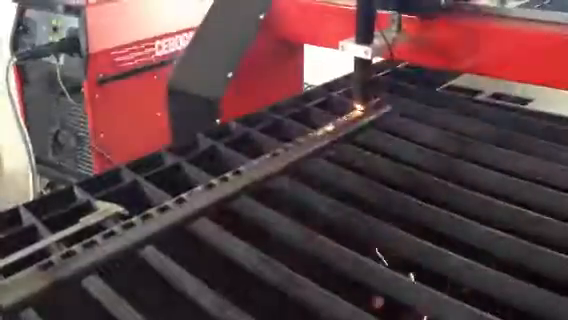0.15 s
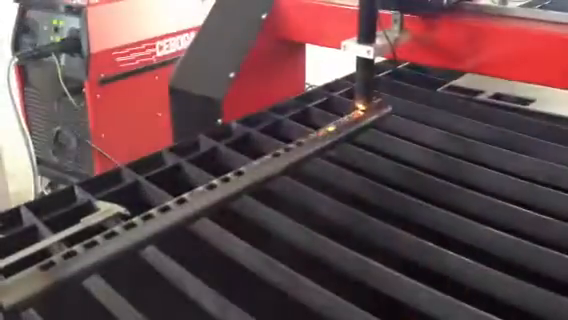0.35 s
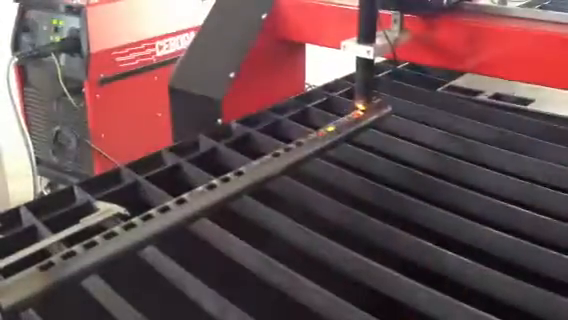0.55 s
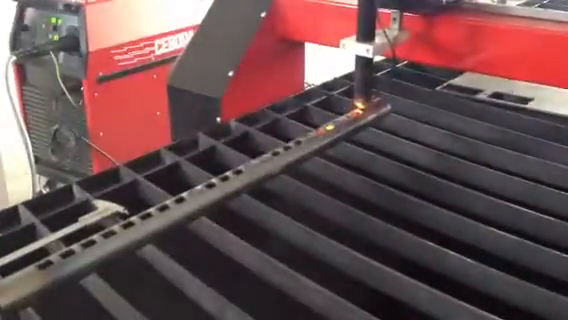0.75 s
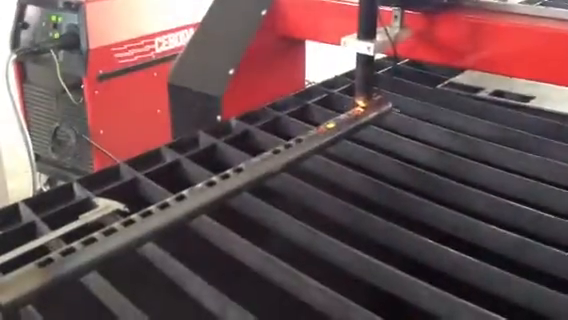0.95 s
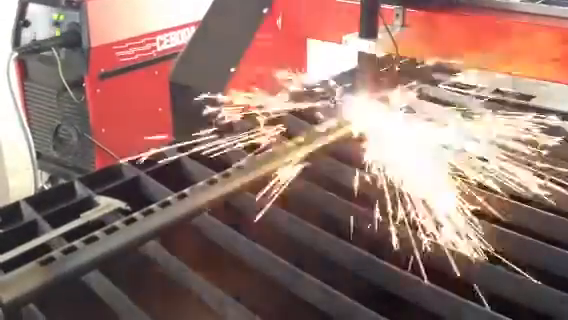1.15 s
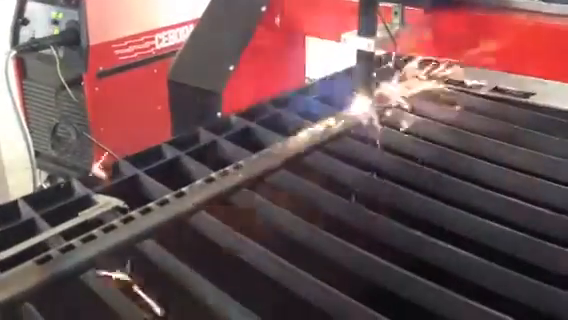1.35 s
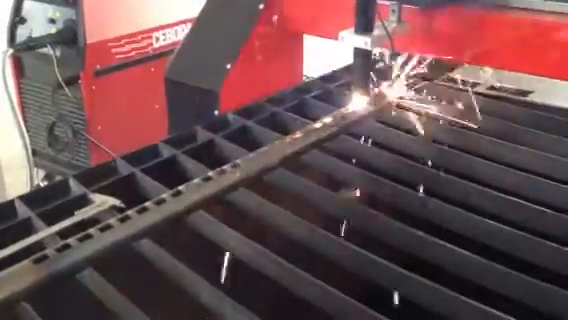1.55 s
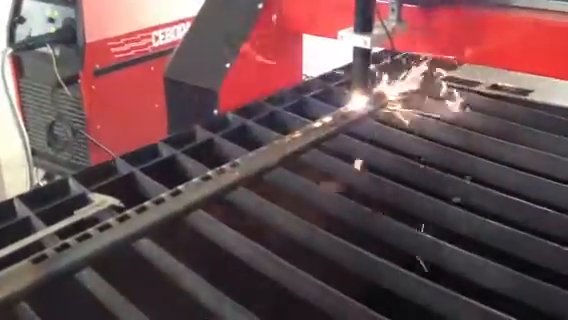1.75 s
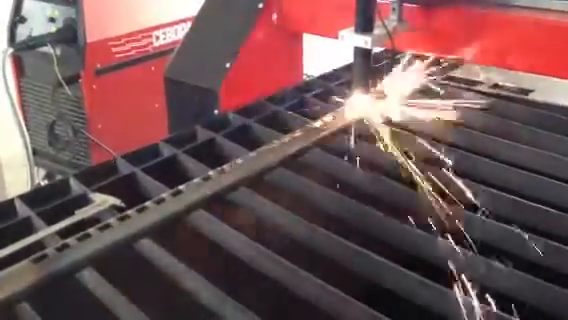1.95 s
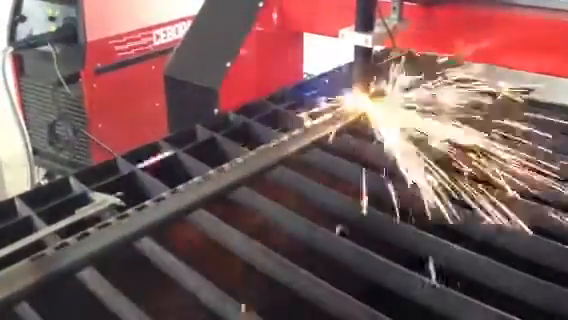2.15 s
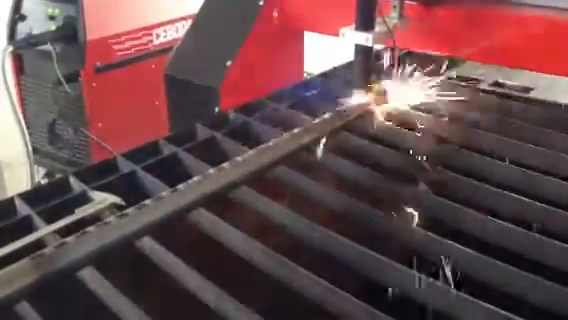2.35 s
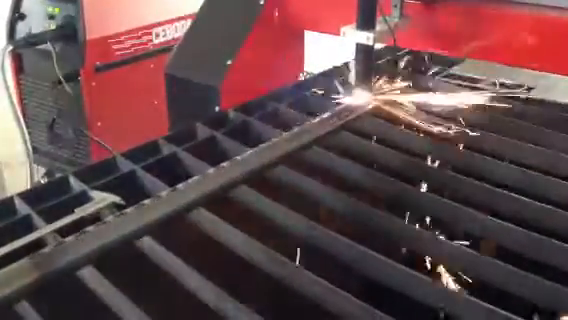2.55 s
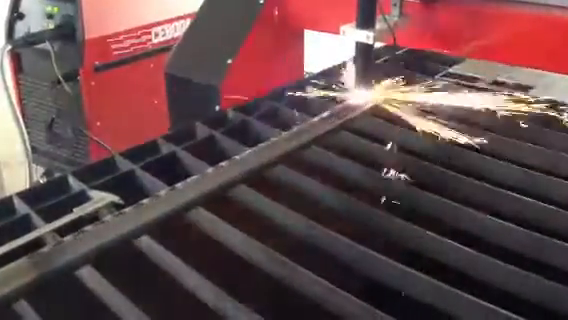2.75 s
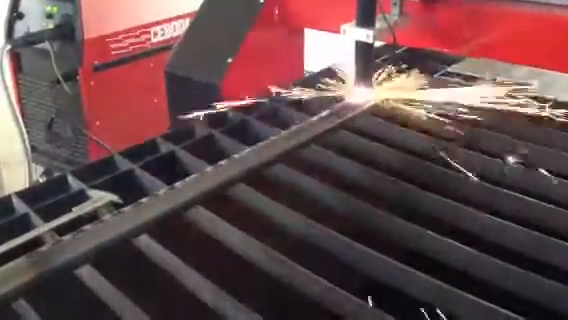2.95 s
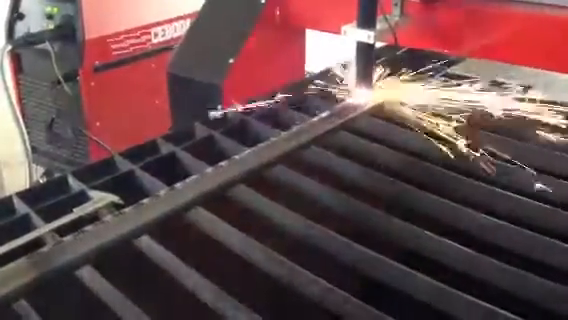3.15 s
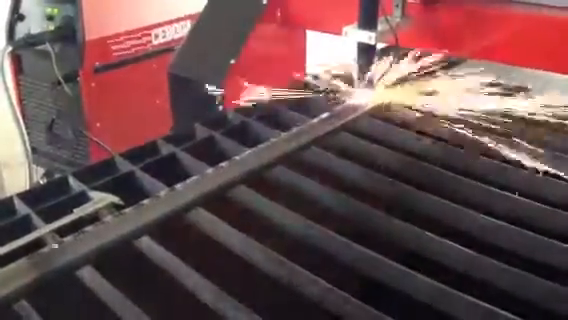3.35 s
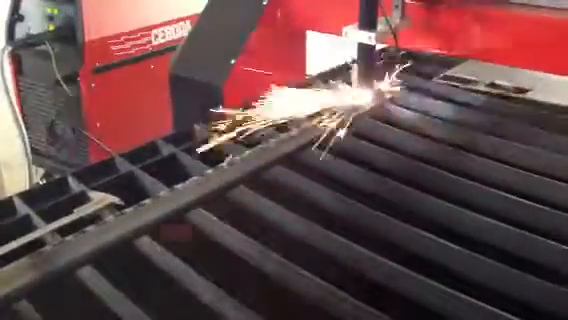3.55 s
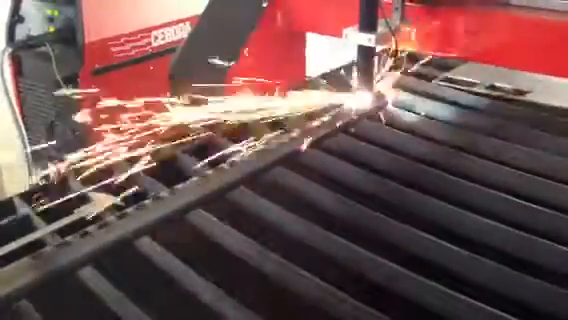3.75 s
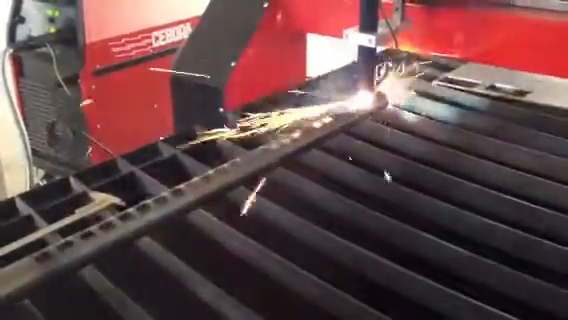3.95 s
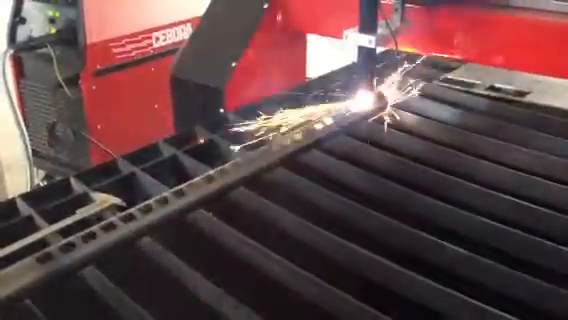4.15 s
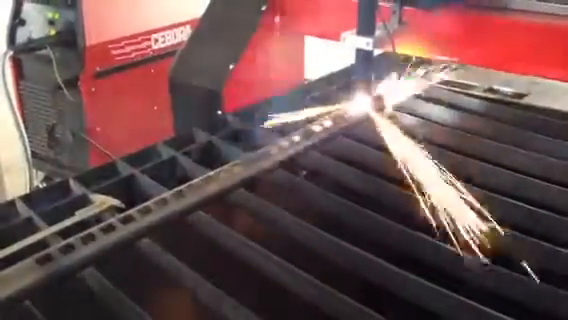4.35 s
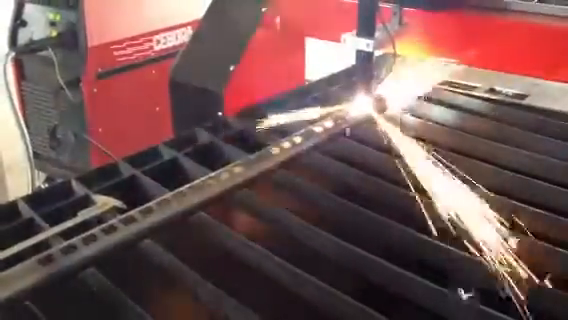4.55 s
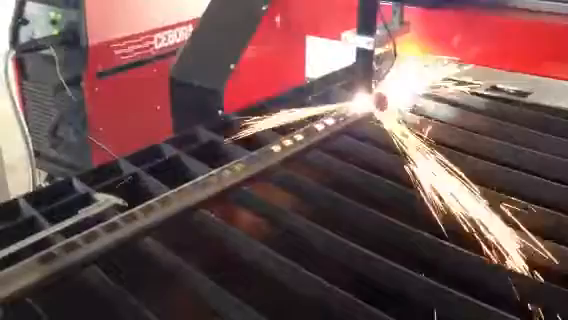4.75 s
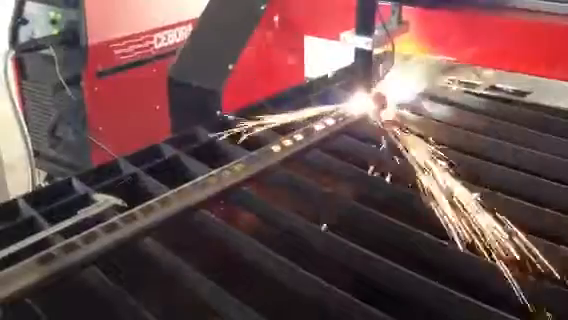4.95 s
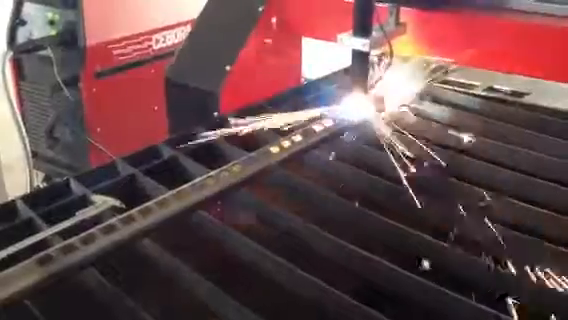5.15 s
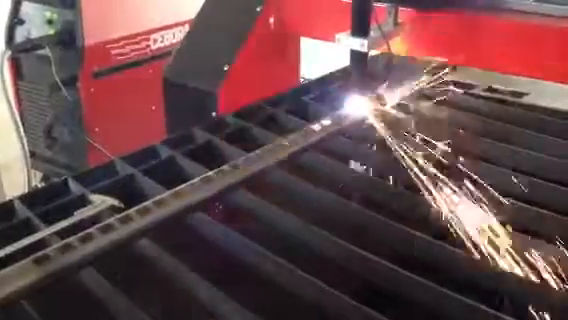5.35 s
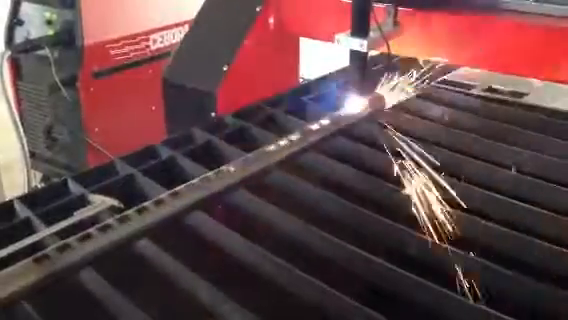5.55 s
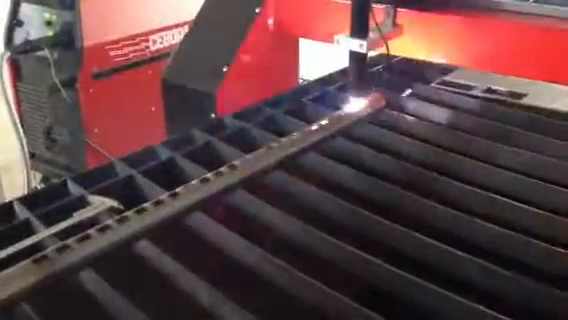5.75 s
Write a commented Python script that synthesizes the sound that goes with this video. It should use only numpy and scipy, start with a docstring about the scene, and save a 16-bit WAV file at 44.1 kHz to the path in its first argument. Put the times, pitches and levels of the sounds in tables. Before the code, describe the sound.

Faint air hiss and a throbbing compressor give way to the loud, surging hiss of a plasma cutter burning through steel.

```python
"""Cold air hisses from the nozzle of a plasma torch, over the drone and throb of a piston compressor.
The arc strikes with a tiny chirp, and the turbulent hot jet roars as it pierces a steel bar.
Resonances of the bar and the cutting table colour the jet; its hiss surges as the hole opens and
chokes as molten steel clogs it. All is heard in a workshop through one microphone, whose automatic
gain control ducks the drone when the jet is loud."""
import sys
import numpy as np
from scipy import signal
from scipy.fft import rfft, irfft
from scipy.io import wavfile
from scipy.ndimage import uniform_filter1d

SR = 44100
rng = np.random.default_rng(int(sys.argv[2]) if len(sys.argv) > 2 else 0)


def unload_audio(sound):
    """Save the sound as a 16-bit wav file, at the path given as the first command line argument."""
    columns = np.transpose(np.atleast_2d(sound))
    # keep every value between -1 and 1, then stretch to whole-number steps
    steps = np.round(np.clip(columns, -1, 1) * 32767)
    wavfile.write(sys.argv[1], SR, steps.astype(np.int16))


N = 256646
TIME = np.arange(N) / SR
STRIKE_S = 1.164  # the arc lights


def gain_of(db):
    """Amplitude ratio of a level in decibels."""
    return 10 ** (np.asarray(db) / 20)


def unit_rms(x):
    """Normalisation to an rms of 1."""
    return x / np.sqrt(np.mean(x ** 2) + 1e-20)


def spectrum_db(points, hz):
    """Level of a spectrum, interpolated linearly over log frequency."""
    f, db = np.transpose(points)
    return np.interp(np.log(hz + 1), np.log(f + 1), db)


def follow(points, t):
    """Value of a breakpoint envelope at the times t."""
    return np.interp(t, *np.transpose(points))


def swell(t, start, end):
    """Rounded rise and fall between two times, 1 in the middle."""
    return np.sqrt(abs(np.sin(np.pi * np.clip((t - start) / (end - start), 0, 1))))


def peak(hz, centre, width):
    """Lorentzian resonance curve, 1 at its centre."""
    return 1 / (1 + (2 * (hz - centre) / width) ** 2)


def hump(hz, centre, octaves):
    """Gaussian band over log frequency, 1 at its centre."""
    return np.exp(-(np.log2((hz + 1) / centre) / octaves) ** 2)


def coloured(points):
    """Stationary noise of rms 1: white noise filtered to the given spectral shape."""
    shape = gain_of(spectrum_db(points, np.fft.rfftfreq(N, 1 / SR)))
    return unit_rms(irfft(rfft(rng.standard_normal(N)) * shape, N))


def wander(rate_hz):
    """Slow random fluctuation of rms 1: noise low-passed at the given rate."""
    hz = np.fft.rfftfreq(N // 64, 64 / SR)
    slow = irfft(rfft(rng.standard_normal(N // 64)) / (1 + (hz / rate_hz) ** 2))
    return unit_rms(np.interp(TIME, np.linspace(0, TIME[-1], len(slow)), slow))


def cold_air(afterblow_db=-22, fade_db_per_s=33, shutoff_s=.02):
    """Turbulent nozzle flow hisses until the arc strikes, while the previous hole's blow dies away."""
    # envelope of the cold flow: t/s, level/dB
    flow_levels = [(0, -22), (.09, -27), (.3, -22), (.8, -28), (1.14, -25)]
    # spectrum of the cold flow: f/Hz, relative level/dB
    flow_spectrum = [(1500, -21), (2800, -9), (3600, -5), (4650, 1), (5050, -6.5), (6200, 3), (7300, 4.5),
                     (8600, 0.5), (9600, -4), (11300, 0), (13500, -2.5), (15200, -12)]
    # spectrum of the dying blow: f/Hz, relative level/dB
    afterblow_spectrum = [(600, -31), (1200, -2.5), (1650, 2), (2400, -8.5), (3400, -3), (4100, -9),
                          (4650, -0.5), (5100, -13), (8000, -28), (15000, -28)]
    cold = np.clip(1 - (TIME - STRIKE_S) / shutoff_s, 0, 1)
    afterblow = coloured(afterblow_spectrum) * gain_of(afterblow_db - fade_db_per_s * TIME)
    return coloured(flow_spectrum) * gain_of(follow(flow_levels, TIME)) * cold + afterblow


def compressor(shaft_hz=16.365, first_stroke_s=.0365, slip_turns=.0019, buzz_db=-41, rumble_db=-29.5):
    """Periodic strokes radiate shaft harmonics; phase-locked neighbours beat, throbbing once a turn."""
    # harmonics of the hum: f/shaft frequency, level/dB
    hum_orders = [(10, -45), (12, -47), (14, -46.5), (16, -44.5), (18, -41.5), (20, -43), (22, -50.5),
                  (26, -51), (34, -47.5), (40, -43), (42, -47.5), (52, -43), (78, -45), (80, -36.5),
                  (86, -43), (141, -46)]
    # adjacent harmonics of the whine: f/shaft frequency, level/dB
    whine_orders = [(57, -35.5), (58, -37.7), (59, -45.5)]
    # spectrum of the fans and machine rumble: f/Hz, relative level/dB
    rumble_spectrum = [(25, -40), (60, -57), (90, -16), (140, -3), (200, 1), (300, -1), (400, -0.5),
                       (500, 0.5), (700, -2), (1000, -2), (1450, -4.5), (2000, -6), (2800, -11.5),
                       (6000, -12.5)]
    angle = 2 * np.pi * (shaft_hz * (TIME - first_stroke_s) + slip_turns * wander(.98))
    surge = swell(TIME, .44, 1.5)  # the low hum swells for a moment
    tone_db = -8 * np.clip((.6 - TIME) / .22, 0, 1) - .5 * surge  # one high tone fades in
    hum = 0
    for order, db in hum_orders:
        hz = order * shaft_hz
        lift_db = 3 * surge * hump(hz, 320, octaves=.25) + tone_db * peak(hz, 1310, width=30)
        amplitude = gain_of(db + lift_db + .5 * wander(rate_hz=1.3))
        hum += amplitude * np.cos(order * angle + 2 * np.pi * rng.random())
    whine = sum(gain_of(db) * np.cos(order * angle) for order, db in whine_orders)
    # the same clatter repeats each turn: a buzz of the weaker harmonics
    buzz = 0
    for order in np.setdiff1d(np.arange(6, 100), [row[0] for row in hum_orders + whine_orders]):
        amplitude = gain_of(spectrum_db(rumble_spectrum, order * shaft_hz)) * rng.rayleigh()
        buzz += amplitude * np.cos(order * angle + 2 * np.pi * rng.random())
    rumble = coloured(rumble_spectrum) * gain_of(rumble_db)
    return np.sqrt(2) * (hum + whine) + unit_rms(buzz) * gain_of(buzz_db) + rumble


def arc_strike(chirp_db=-18, start_hz=5000, end_hz=3300, length_s=.009):
    """The discharge jumps to the steel with a brief transient, a falling linear chirp."""
    progress = np.clip((TIME - STRIKE_S) / length_s, 0, 1)
    hz = start_hz + (end_hz - start_hz) * progress
    return gain_of(chirp_db) * np.sin(np.pi * progress) * np.sin(2 * np.pi * np.cumsum(hz) / SR)


def hot_jet(level_db=-6, catch_s=.005, patchy_db=1.1, flutter_db=.54):
    """Source and filter: broadband turbulence takes on a spectrum that shifts as the hole opens."""
    # spectrum of the hot jet: f/Hz, relative level/dB
    jet_spectrum = [(150, -39.5), (400, -21), (800, -8), (1200, -12), (1700, -7.5), (2700, -4.5),
                    (4000, -2), (5100, -5), (6200, -0.75), (7600, 0.0), (10000, -10), (11600, -5),
                    (13500, -4), (15300, -8.5)]
    frames = dict(fs=SR, nperseg=1536, noverlap=1280)
    hz, t, noise = signal.stft(rng.standard_normal(N), **frames)
    hz = hz[:, None]
    db = spectrum_db(jet_spectrum, hz) + roar_db(hz, t) + hiss_db(hz, t)
    db += resonances_db(hz, t) + echo_ripple_db(hz, t) + shock_noise_db(hz, t)
    # narrow bands of the hiss flare and fade at random
    patches = uniform_filter1d(rng.standard_normal(noise.shape), size=6, axis=0)
    patches = unit_rms(uniform_filter1d(patches, size=16, axis=1))
    turbulence = signal.istft(noise * gain_of(db + patchy_db * patches), **frames)[1][:N]
    lit = np.clip((TIME - STRIKE_S) / catch_s + .5, 0, 1)
    drop_db = np.interp(TIME - 2.757, [0, .012, .18], [0, -4, 0])  # a sudden dip at the jet's loudest
    return turbulence * lit * gain_of(level_db + drop_db + flutter_db * wander(rate_hz=25))


def roar_db(hz, t, start_db=-11.5, build_s=.053, creep_db_per_s=.21):
    """Impingement noise of gas on steel builds after the strike, then creeps up as the hole deepens."""
    age = np.maximum(t - STRIKE_S, 0)
    lift_db = start_db * np.exp(-age / build_s) + creep_db_per_s * age
    return lift_db * hump(hz, 2220, octaves=.77)


def hiss_db(hz, t):
    """Flow noise follows the hole's shape; constriction by molten steel trades hiss for high sizzle."""
    # surges of the hiss: t/s, level change/dB
    surges = [(1.165, -3), (1.21, 4), (1.29, 1), (1.67, -2), (1.89, -2.5), (2.02, 2), (2.19, -3.5),
              (2.45, 3), (2.72, 7), (3.12, 2.5), (3.45, 4), (3.7, 0), (4.15, 1), (4.4, 1), (4.65, 1),
              (4.98, 1.5), (5.48, -1.5), (5.8, 3)]
    # clogs in the hole: start t/s, end t/s, level change/dB
    chokes = [(1.29, 1.432, -5), (1.91, 1.988, -5), (2.11, 2.204, -1), (3.56, 3.636, -1),
              (3.946, 4.017, -0.5), (4.19, 4.305, -4), (5.065, 5.2, -2), (5.49, 5.58, -1)]
    choke_db = sum(depth * swell(t, start, end) for start, end, depth in chokes)
    sizzle_db = -choke_db * hump(hz, 13300, octaves=.51)
    return (follow(surges, t) + choke_db) * hump(hz, 7860, octaves=.89) + sizzle_db


def resonances_db(hz, t):
    """Steady resonances and notches colour the jet, while breathy bands swell and fade in its noise."""
    # modes of the bar and the slatted table: f/Hz, bandwidth/Hz, level change/dB
    modes = [(1320, 300, 5), (1765, 18, 19.5), (2280, 240, 1), (2670, 76, 2), (2845, 38, 6), (3040, 380, 2),
             (4540, 320, 4.5), (4796, 170, 4.5)]
    # notches that make the jet sound hollow: f/Hz, bandwidth/Hz, level change/dB
    notches = [(1764, 17, -15.5), (2030, 56, -4), (2770, 134, -8.5), (3400, 71, -2), (5050, 300, -2.5)]
    # breathy bands that swell and fade: start t/s, end t/s, f/Hz, bandwidth/Hz, level change/dB
    passing_tones = [(1.148, 1.345, 3650, 700, 8), (1.2, 2.3, 1910, 120, 6), (1.25, 2.28, 4480, 300, 3.5),
                     (1.604, 2.45, 1610, 167, 7), (2.25, 2.74, 4300, 200, 7), (2.848, 3.5, 3020, 170, 4.5),
                     (3.02, 3.383, 1410, 160, 8), (3.08, 3.56, 7450, 700, 4.5), (3.52, 3.76, 9800, 450, 6),
                     (3.7, 5.95, 1920, 130, 10), (4.35, 5.1, 3160, 300, 4.5), (4.35, 5.95, 2410, 161, 6.5),
                     (4.4, 4.85, 3750, 400, 5), (5.25, 6.1, 4550, 700, 2.5)]
    db = sum(lift * peak(hz, centre, width) for centre, width, lift in modes + notches)
    for start, end, centre, width, lift in passing_tones:
        db = db + lift * swell(t, start, end) * peak(hz, centre, width)
    return db


def echo_ripple_db(hz, t, mean_delay_s=.000596, swing=.17, depth_db=.92):
    """Comb filtering: the hiss interferes with its echo off the bar, swishing as the spray turns."""
    delay_s = mean_delay_s * (1 + swing * np.interp(t, TIME, wander(rate_hz=.68)))
    return depth_db * np.cos(2 * np.pi * hz * delay_s)


def shock_noise_db(hz, t, start_hz=11400, rest_hz=9930, slide_s=.13, attack_s=.038, release_s=.27):
    """Shock noise comes in spells: a high band slides down and settles as its narrow crest fades."""
    # spells of shock noise: start t/s, end t/s, level change/dB
    spells = [(2.212, 4.2, 5), (5.593, 6.1, 3)]
    db = 0
    for start, end, lift in spells:
        age = np.maximum(t - start, 0)
        unsettled = np.exp(-age / slide_s)
        centre = rest_hz + (start_hz - rest_hz) * unsettled
        envelope = np.clip(np.minimum(age / attack_s, (end - t) / release_s), 0, 1)
        crest_db = 8.5 * unsettled * peak(hz, centre, width=700)
        db += envelope * (lift * hump(hz, centre, octaves=.3) + crest_db)
    return db


def workshop(x, wet_db=-15, t60_s=.039, echoes_per_s=1500, gap_s=.004):
    """Reverberation: scattered reflections from the table, gantry and walls decay exponentially."""
    t = np.arange(SR // 2) / SR
    taps = rng.standard_normal(len(t)) * (rng.random(len(t)) < echoes_per_s / SR)
    taps *= (t > gap_s) * gain_of(-60 * t / t60_s)
    reflections = signal.fftconvolve(x, taps / np.linalg.norm(taps))[:N]
    wet = gain_of(wet_db)
    return (x + wet * reflections) / np.sqrt(1 + wet ** 2)


def gain_control(x, threshold_db=-15, ratio=6.5, attack_s=.02, recover_db_per_s=11.5, opening_db=8.5):
    """Dynamic compression: the gain starts low, recovers slowly and falls fast when the jet is loud."""
    pole = np.exp(-1 / (attack_s * SR))
    power = signal.lfilter([1 - pole], [1, -pole], (x ** 2).mean(0))
    over_db = np.maximum(10 * np.log10(power + 1e-12) - threshold_db, 0) * (1 - 1 / ratio)
    recovery_db = recover_db_per_s * TIME
    duck_db = np.maximum(np.maximum.accumulate(over_db + recovery_db), opening_db) - recovery_db
    return x * gain_of(-duck_db)


def scene():
    """Superposition of the torch, its reflections and the compressor, the same in both channels."""
    mix = workshop(hot_jet() + arc_strike() + cold_air()) + compressor()
    return np.array([mix, mix])


def record(dry):
    """Gain control and soft saturation tame the peaks; two filters limit the bandwidth."""
    ceiling, knee = .76, 8
    low_hz, high_hz = 55, 15330
    ducked = gain_control(dry)
    rounded = ducked / (1 + abs(ducked / ceiling) ** knee) ** (1 / knee)
    highpass = signal.butter(4, low_hz, "high", fs=SR, output="sos")
    lowpass = signal.firwin(1023, high_hz, window=("kaiser", 9), fs=SR)
    return signal.oaconvolve(signal.sosfilt(highpass, rounded), lowpass[None], "same")


dry = scene()
out = record(dry)
unload_audio(out)
```